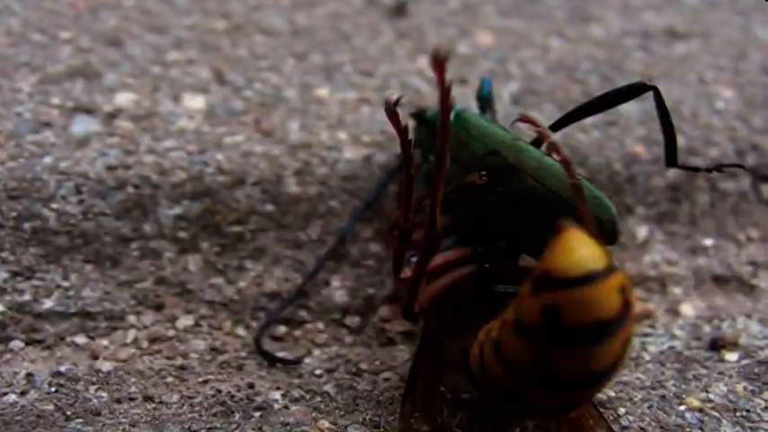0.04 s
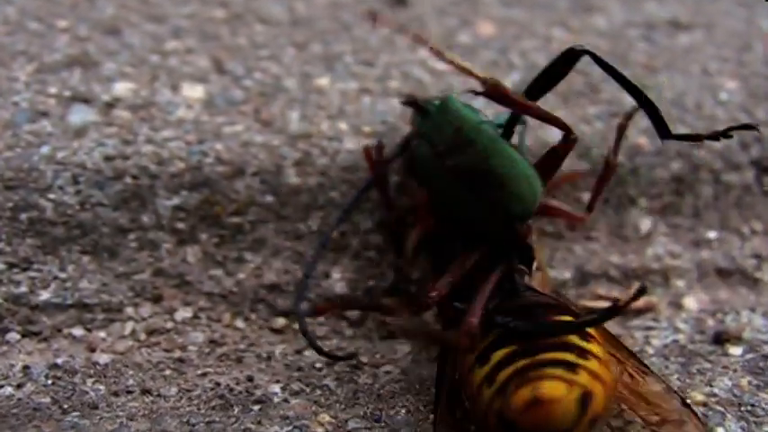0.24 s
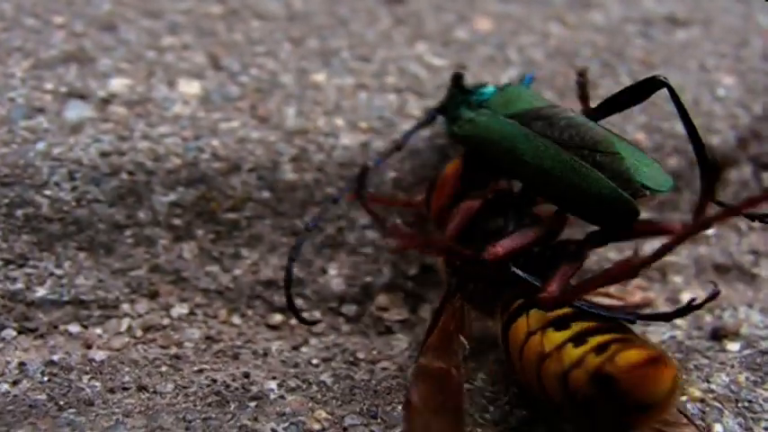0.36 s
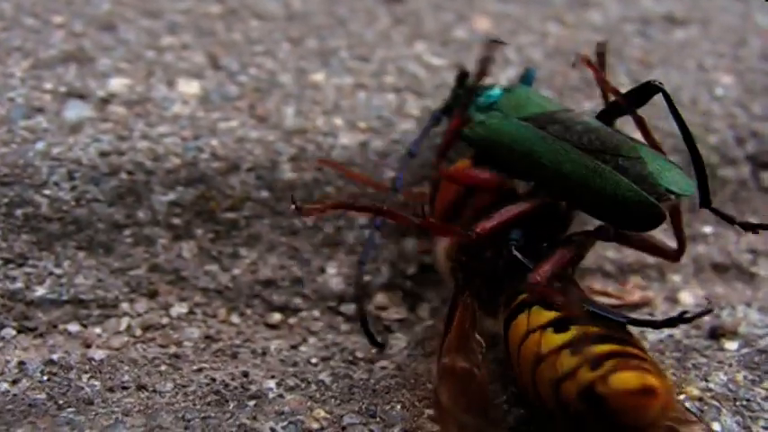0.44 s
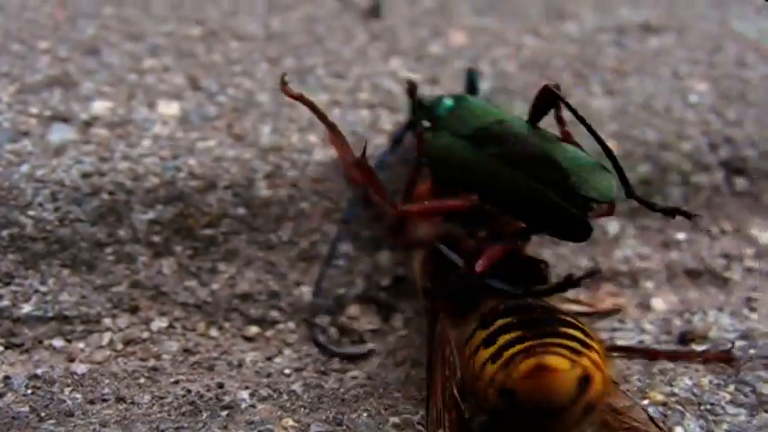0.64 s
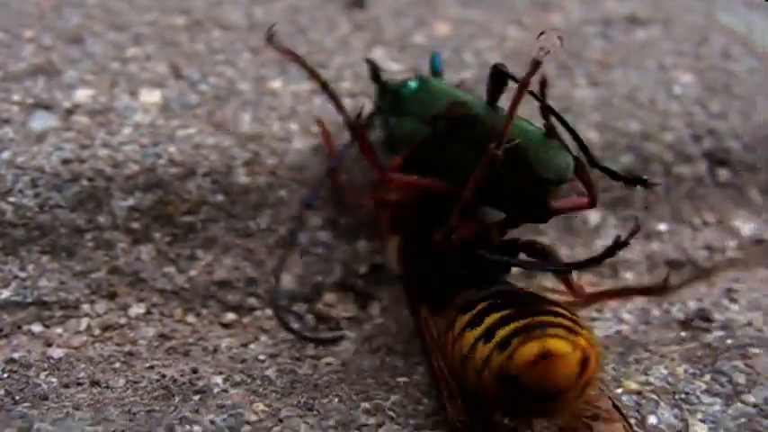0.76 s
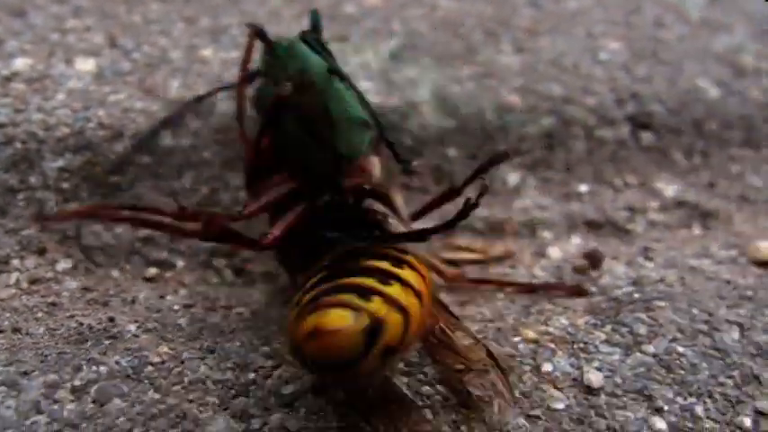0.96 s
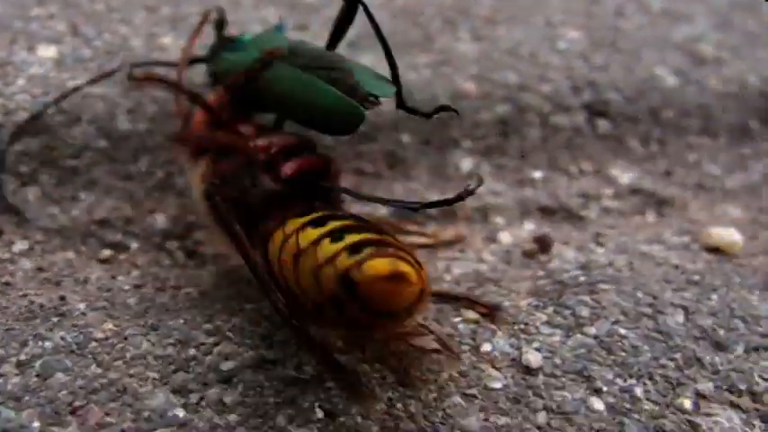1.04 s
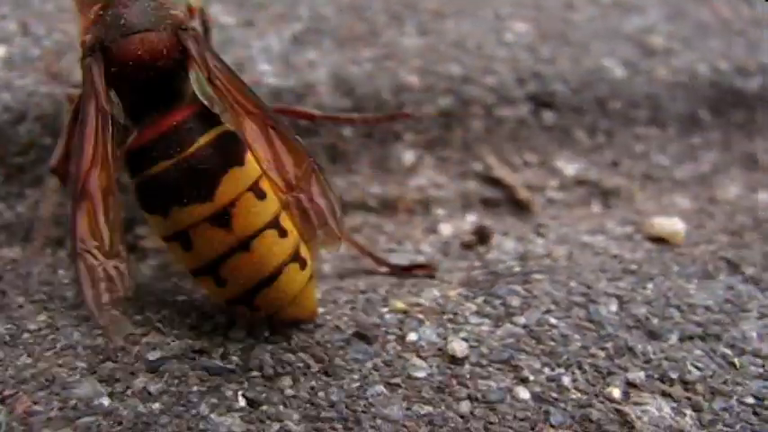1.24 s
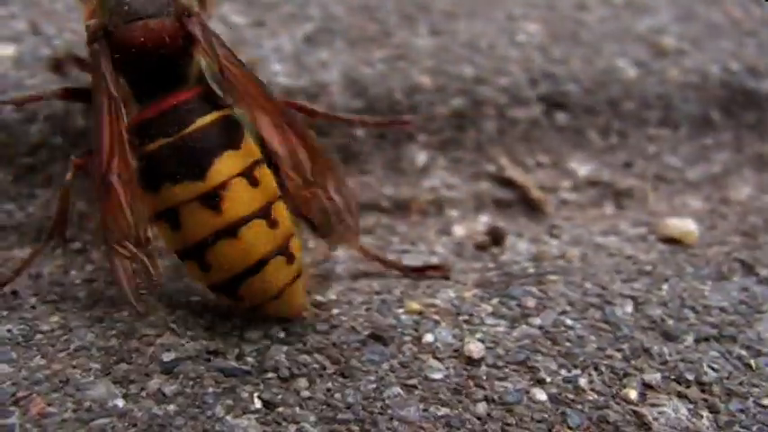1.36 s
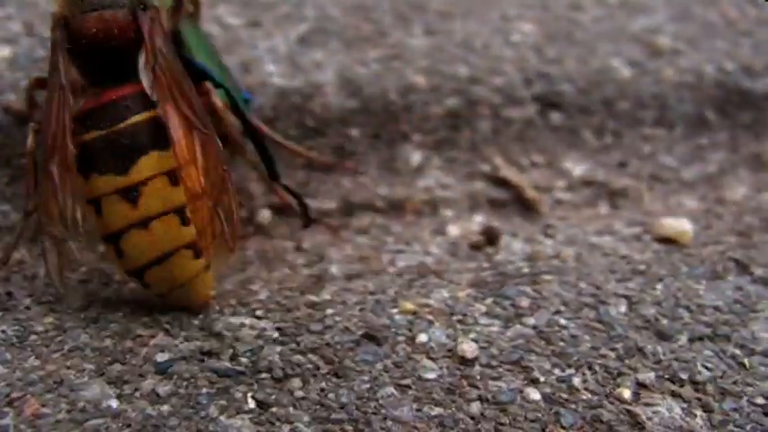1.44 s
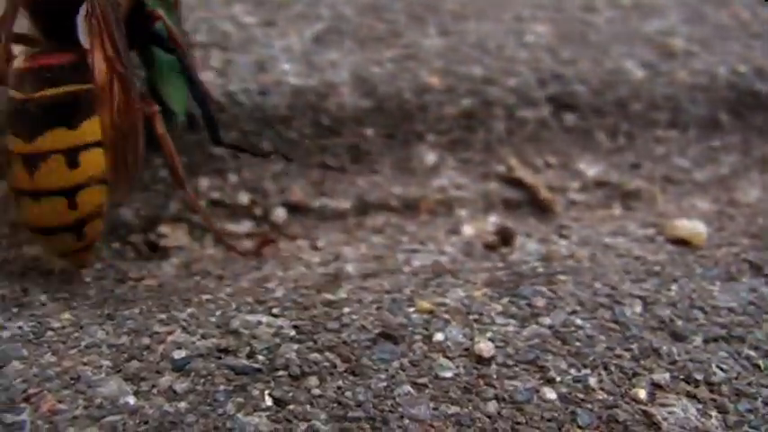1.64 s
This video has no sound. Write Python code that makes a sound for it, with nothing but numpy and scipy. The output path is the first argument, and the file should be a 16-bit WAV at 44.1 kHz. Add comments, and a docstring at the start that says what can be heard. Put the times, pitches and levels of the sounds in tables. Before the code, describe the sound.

Microphone handling noise: a hard crack, dry skid and dull knocks in light wind.

```python
"""Wind buffets a hand-held stereo microphone over outdoor hiss and a faint hum; then one hard crack.
It is handling noise, right at the microphone: the crack, a dry stick-slip skid, light ticks and
a few dull knocks, each contact a gritty click with a short hollow ring.
Faint, grainy rubbing follows, and a soft tap comes near the end."""
import sys
import numpy as np
from scipy import signal
from scipy.fft import rfft, irfft
from scipy.io import wavfile
from scipy.ndimage import uniform_filter1d

SR = 44100
rng = np.random.default_rng(int(sys.argv[2]) if len(sys.argv) > 2 else 0)


def inscribe(sig):
    """Save sig as 16-bit PCM at rate SR to the path in sys.argv[1].

    A 1-D sig is mono; a 2-D sig holds one channel per row.
    Samples are clipped to [-1, 1] before scaling.
    """
    pcm = np.round(np.clip(np.atleast_2d(sig).T, -1, 1) * 32767)
    wavfile.write(sys.argv[1], SR, pcm.astype(np.int16))


N = 74970
T = np.arange(N) / SR

# Levels are relative. Mid is what both channels share, side is what they carry in opposite sign.
# Spectra of the distant hiss and of the wind on the microphone: freq_hz, level_db
HISS_MID_SPECTRUM = [(18, -62), (30, -25), (53, -1), (152, -1.5), (177, -0.5), (245, -5), (348, -7),
                     (435, -6.5), (666, -8.5), (945, -9), (1020, -8.5), (5440, -25), (11800, -39),
                     (15300, -62), (22000, -120)]
HISS_SIDE_SPECTRUM = [(18, -40), (30, 11), (70, 0), (201, -3), (292, -27.5), (588, -15), (666, -7.5),
                      (1280, -19), (1370, -19), (2380, -23), (11800, -29), (15300, -72), (22000, -120)]
WIND_SPECTRUM = [(20, -36), (55, -2), (95, -5.5), (150, -4), (250, -11), (400, -20), (800, -41),
                 (3000, -74)]
# Slow drift of the hiss, and the gusts: time_s, level_db
HISS_ENVELOPE = [(0.0, -56.5), (0.43, -58.5), (0.742, -55.5), (0.904, -55.5), (1.168, -55.5), (1.7, -54)]
WIND_ENVELOPE = [(0, -53), (.1, -40), (.185, -35), (.25, -48.5), (.35, -35.5), (.45, -45.5), (.52, -56.5),
                 (.68, -39.5), (.76, -38.5), (.84, -41.5), (.89, -57.5), (1.05, -85), (1.23, -70),
                 (1.28, -52), (1.36, -59), (1.7, -60)]
# Tones of the background hum: pitch_hz, mid_db, side_db
HUM_TONES = [(60, -60, -79), (184.2, -62.5, -111), (662, -71, -74.5), (772, -70.5, -69), (1250, -76, -76),
             (3630, -75.5, -88), (4950, -78, -86), (5410, -79.5, -79)]

# Faint grainy rubbing, and the rubbing between the ticks of the skid: time_s, level_db
GRAINY_RUB_ENVELOPE = [(.72, -74), (.75, -48), (.77, -42.5), (.792, -41.5), (.805, -59), (.92, -49.5),
                       (1.03, -49), (1.09, -54), (1.25, -77.5)]
SKID_RUB_ENVELOPE = [(.43, -81), (.437, -39), (.446, -40), (.452, -73), (.461, -34), (.465, -55),
                     (.470, -38), (.475, -91)]
# Spectrum of the grainy rubbing: freq_hz, level_db
GRAINY_RUB_SPECTRUM = [(60, -4), (200, 2.5), (550, 2), (1200, -7.5), (3000, -17.5), (9000, -36.5),
                       (12500, -73), (14000, -76)]
# A soft hollow tap and its rebound: start_s, level_db
TAP_HITS = [(1.5105, -33), (1.5146, -41.5)]

# Light ticks, dull knocks, the stick-slip skid, and the hard crack with its rebound:
# start_s, level_db, grit_decay_s, brightness_hz
TICK_HITS = [(.2295, -20, 0.0023, 8000), (.2585, -29, 0.0034, 9100), (.4679, -19, .0006, 14500),
             (.4788, -20, 0.00037, 8000), (.6762, -11.5, 0.00042, 8200), (.6902, -3, 0.0021, 14500),
             (.7390, -5, 0.0027, 14200), (.7545, -2.5, 0.0019, 13900), (.7587, -11.5, 0.00021, 13000),
             (.7918, -12, 0.00063, 6000), (.9185, -38, 0.00059, 4500), (1.1735, -14.5, .0012, 6500),
             (1.5105, -15, 0.00062, 7040)]
KNOCK_HITS = [(.6891, -9.5, 0.00022, 12200), (.6904, -1, 0.00099, 11500), (.6937, -3.5, 0.0012, 2020),
              (.7402, -16.5, 0.0015, 1610), (.7428, -3, 0.0015, 1810), (.7560, -6.5, 0.0014, 1800),
              (.7597, -8, 0.0011, 1290), (.7635, -11.5, 0.0029, 1500), (.7918, -15, 0.0028, 1500)]
SKID_HITS = [(.4344, -9.5, 0.00051, 15100), (.4378, -17.5, 0.00045, 13300), (.4416, -3.5, 0.00092, 7000),
             (.4444, -7, 0.00076, 11000), (.4476, -33, .001, 7000), (.4493, -9, 0.00032, 5000),
             (.4539, 0.5, 0.00035, 12500), (.4580, 0, 0.00025, 11700), (.4622, -11, 0.00087, 10000),
             (.4681, 2, 0.00031, 2620)]
CRACK_HITS = [(.2120, -5, .0008, 14000), (.2127, 0, .001, 9000), (.2160, -2.5, .0018, 5500)]
# Spectrum of each kind of click: freq_hz, level_db
TICK_SPECTRUM = [(300, -13), (1500, 3), (3200, 7), (4200, -4.5), (6000, -4.5), (7000, 2.5), (8200, -18),
                 (9700, -5.5), (11500, -12.5), (13400, -1.5), (15000, -12)]
KNOCK_SPECTRUM = [(50, -20), (180, 1.5), (420, 3), (550, 4.5), (900, -1.5), (1400, -0.5), (1900, -9),
                  (3500, -21), (5500, -10), (7500, -24.5), (13000, -51)]
SKID_SPECTRUM = [(100, -36), (400, -23), (1000, -6.5), (2000, -2), (3000, -3.5), (3700, -12), (5000, -10),
                 (5900, -0.5), (7600, -13), (11000, -14.5), (12700, -5.5), (14000, -8.5)]
CRACK_SPECTRUM = [(60, -12.5), (180, -11.5), (350, -24), (600, -3.5), (1150, -6.5), (1400, -14),
                  (1900, 1.5), (2200, -3.5), (2600, -11.5), (3700, -9.5), (4600, -16.5), (5800, -14.5),
                  (8500, -19), (13500, -14.5), (15000, -30)]
# Stereo width of each kind of click: freq_hz, side_over_mid_db
TICK_SIDE = [(5000, -14), (8000, -1), (13000, 6)]
KNOCK_SIDE = [(130, -7), (300, -19), (600, -1.5), (1100, -7.5), (1400, -4.5), (2200, -6), (5000, -19),
              (10000, -5)]
SKID_SIDE = [(600, 16), (1000, -1), (1400, 2.5), (2000, -14), (3000, -9), (4000, 3), (5800, -17),
             (9000, 7.5), (13000, 4)]
CRACK_SIDE = [(180, 3), (330, 24), (500, 4), (800, 1.5), (1080, -5), (1350, 5), (2000, -14), (4500, -2),
              (7500, -1), (13000, -15)]
# Hollow modes shared by these four kinds of contact: pitch_hz, level_db, t60_s, left_lead_rad
RING_MODES = [(558, -43, .07, 1.2), (835, -45, .045, 1.1), (1130, -45, .03, .1), (1400, -45, .03, 2.2),
              (1835, -43, .028, .2), (2125, -41, .03, .2), (2445, -46, .04, .3), (2955, -50, .035, .2),
              (3750, -49, .02, .2), (5620, -51, .02, .2)]
# Colour of these contacts, added on the left and taken off on the right: freq_hz, gain_db
LEFT_COLOUR = [(250, -0.33), (550, -1.5), (850, 2.9), (1300, -2), (2100, 1.5), (3000, -1.3), (4200, 3.5),
               (6000, 0.5), (9000, -0.3)]


def amp(db):
    """Decibels to gain."""
    return 10 ** (np.asarray(db) / 20)


def unit_rms(x):
    """Scales to rms 1."""
    return x / np.sqrt(np.mean(x ** 2) + 1e-20)


def db_at(spectrum, hz):
    """Reads a spectrum on a log-frequency axis."""
    freq_hz, level_db = np.transpose(spectrum)
    return np.interp(np.log(hz + 1), np.log(freq_hz + 1), level_db)


def envelope(points):
    """A dB curve as a gain for every sample."""
    return amp(np.interp(T, *np.transpose(points)))


def add(mix, start_s, sound):
    """Mixes a sound in at start_s."""
    part = mix[max(round(start_s * SR), 0):][:len(sound)]
    part += sound[:len(part)]


def shaped(x, spectrum, amount=1):
    """Raises each frequency by the given dB times amount."""
    return irfft(rfft(x) * amp(amount * db_at(spectrum, np.fft.rfftfreq(N, 1 / SR))), N)


def coloured(x, spectrum):
    """Minimum-phase filter of unit energy: nothing sounds ahead of an attack."""
    log_gain = np.log(amp(db_at(spectrum, abs(np.fft.fftfreq(8192, 1 / SR)))))
    response = np.exp(np.conj(signal.hilbert(log_gain)))
    impulse = np.fft.ifft(response).real[:2048]
    return signal.fftconvolve(x, impulse / np.linalg.norm(impulse))[:N]


def noise(spectrum):
    """Noise of rms 1 with the given spectrum."""
    return unit_rms(shaped(rng.standard_normal(N), spectrum))


def low_pass(x, hz, size):
    """Steep low-pass of both channels."""
    kernel = signal.firwin(size, hz, window=("kaiser", 8), fs=SR)
    return signal.fftconvolve(x, kernel[None], "same")


def stereo(mid, side):
    """Left and right from mid and side."""
    return np.array([mid + side, mid - side])


def close_stereo(mid, side, width):
    """A close sound reaches the two microphone ports out of phase."""
    return stereo(mid, shaped(signal.hilbert(side).imag, width))


def hiss(mid_db=3, side_db=-1, top_hz=12150):
    """Distant outdoor wash, slowly changing in level."""
    wash = stereo(amp(mid_db) * noise(HISS_MID_SPECTRUM), amp(side_db) * noise(HISS_SIDE_SPECTRUM))
    return low_pass(wash * envelope(HISS_ENVELOPE), top_hz, size=401)


def hum(waver_hz=5):
    """Faint tones in the background, each wavering in pitch."""
    out = np.zeros((2, N))
    for pitch_hz, mid_db, side_db in HUM_TONES:
        drift = unit_rms(uniform_filter1d(rng.standard_normal(N), size=2000))
        phase = 2 * np.pi * np.cumsum(pitch_hz + waver_hz * drift) / SR
        out += np.sqrt(2) * stereo(amp(mid_db) * np.sin(phase), amp(side_db) * np.cos(phase))
    return out


def wind(mid_db=-11):
    """Low buffeting on the microphone itself, mostly opposed between the channels."""
    return envelope(WIND_ENVELOPE) * stereo(amp(mid_db) * noise(WIND_SPECTRUM), noise(WIND_SPECTRUM))


def grainy_rub(grains_per_s=2500, spread_db=2.5, width=0.28):
    """Faint rubbing close to the microphone, made of many soft grains."""
    sizes = amp(spread_db * np.minimum(rng.exponential(1, (2, N)), 3))
    signs = rng.choice([-1, 1], (2, N))
    onsets = rng.random((2, N)) < grains_per_s / SR
    mid, side = (unit_rms(coloured(grains, GRAINY_RUB_SPECTRUM)) for grains in sizes * signs * onsets)
    return envelope(GRAINY_RUB_ENVELOPE) * stereo(mid, width * side)


def soft_taps(pitch_hz=710, t60_s=0.014, width=0.76):
    """A soft blow and its rebound ring one low, quickly damped mode."""
    mid, t = np.zeros(N), T[:SR // 20]
    for start_s, level_db in TAP_HITS:
        add(mid, start_s, amp(level_db - 60 * t / t60_s) * np.sin(2 * np.pi * pitch_hz * t))
    return stereo(mid, width * signal.hilbert(mid).imag)


def skid_rub():
    """Rubbing between the ticks of the skid."""
    sliding = (T > SKID_RUB_ENVELOPE[0][0]) & (T < SKID_RUB_ENVELOPE[-1][0])
    friction = noise(SKID_SPECTRUM)
    return sliding * envelope(SKID_RUB_ENVELOPE) * close_stereo(friction, friction, SKID_SIDE)


def contact_force(hits, grit, grit_above_hz=2070):
    """Each contact is one push, then grit that dies within milliseconds; soft contacts are duller."""
    force, t = np.zeros(N), T[:SR // 40]
    grit_filter = signal.butter(2, grit_above_hz, "high", fs=SR)
    for start_s, level_db, grit_decay_s, brightness_hz in hits:
        grains = rng.standard_normal(len(t)) * np.exp(-t / grit_decay_s)
        crunch = signal.lfilter(*grit_filter, grains)
        crunch[0] = 0
        crunch *= grit / np.linalg.norm(crunch)
        crunch[0] = 1  # the push
        softened = signal.lfilter(*signal.butter(2, brightness_hz, fs=SR), crunch)
        add(force, start_s, amp(level_db) * softened)
    return force


def hollow_ring(force):
    """The force excites short damped modes that reach the two channels out of step."""
    t = T[:SR // 6]
    modes = np.zeros((2, len(t)))
    for pitch_hz, level_db, t60_s, left_lead_rad in RING_MODES:
        phase = 2 * np.pi * pitch_hz * t + np.array([[left_lead_rad], [-left_lead_rad]]) / 2
        modes += amp(level_db - 60 * t / t60_s) * np.cos(phase)
    return signal.fftconvolve(force[None], modes, axes=1)[:, :N]


def blows(hits, spectrum, width, click_db, ring_db, grit):
    """Contacts of one kind: a dry click with separate grit in mid and side, and the push's ring."""
    mid, side = (coloured(contact_force(hits, grit), spectrum) for _ in range(2))
    click = close_stereo(mid, side, width)
    ring = hollow_ring(contact_force(hits, grit=0))
    return amp(click_db) * click + amp(ring_db) * ring


def handling():
    """Handling noise on the hand-held microphone; each channel has its own colour."""
    crack = blows(CRACK_HITS, CRACK_SPECTRUM, CRACK_SIDE, click_db=5.5, ring_db=6, grit=1.23)
    skid = blows(SKID_HITS, SKID_SPECTRUM, SKID_SIDE, click_db=-6.5, ring_db=-5, grit=0.85)
    skid += skid_rub()
    knocks = blows(KNOCK_HITS, KNOCK_SPECTRUM, KNOCK_SIDE, click_db=-4, ring_db=3, grit=1.0)
    ticks = blows(TICK_HITS, TICK_SPECTRUM, TICK_SIDE, click_db=-19.5, ring_db=-40, grit=1.73)
    left, right = crack + skid + knocks + ticks
    return np.array([shaped(left, LEFT_COLOUR), shaped(right, LEFT_COLOUR, amount=-1)])


def scene():
    """Handling noise and wind at the microphone, outdoor hiss and hum behind."""
    return handling() + soft_taps() + grainy_rub() + hiss() + hum() + wind()


def record(dry, ceiling=0.32, top_hz=14400):
    """The microphone overloads softly on the loudest crack; then the top treble is cut."""
    return low_pass(ceiling * np.tanh(dry / ceiling), top_hz, size=121)


dry = scene()
out = record(dry)
inscribe(out)
```